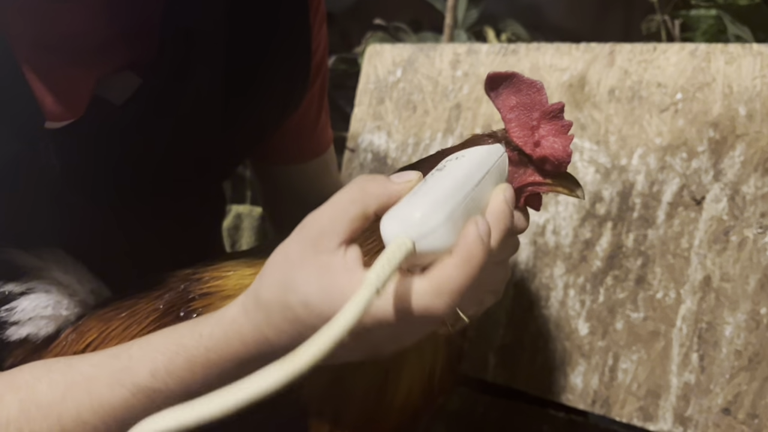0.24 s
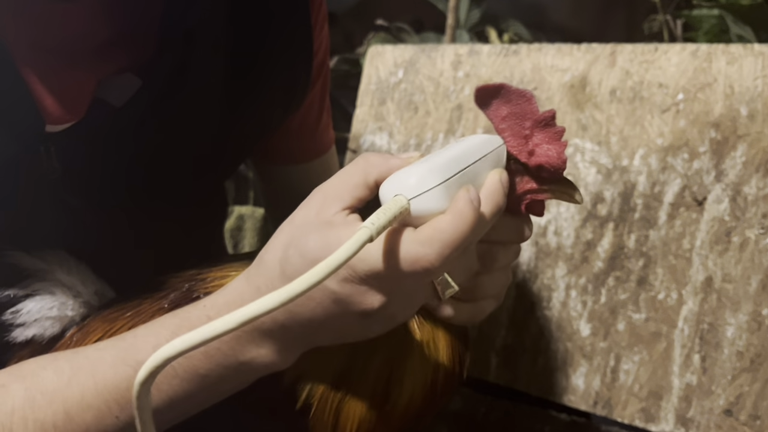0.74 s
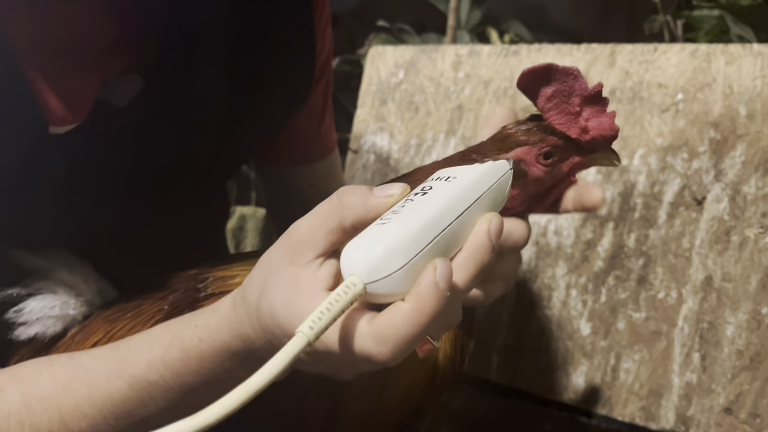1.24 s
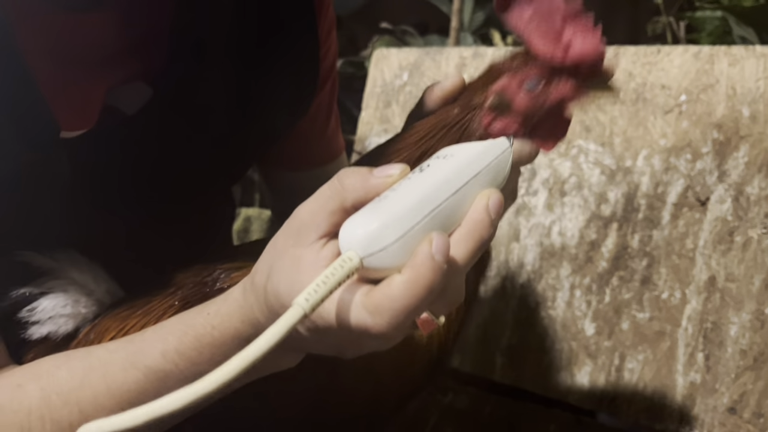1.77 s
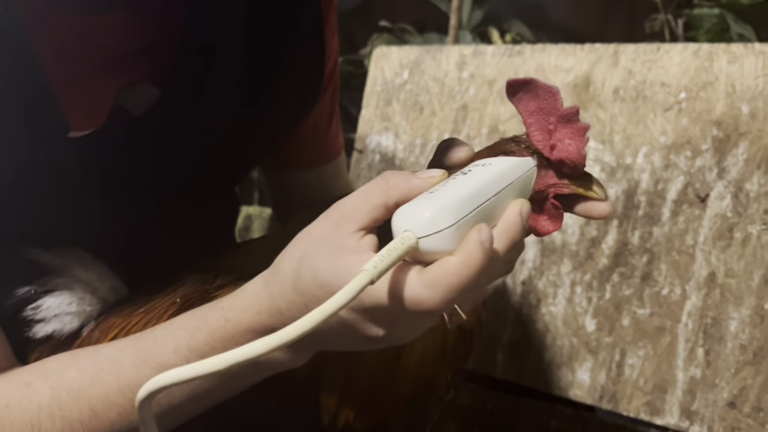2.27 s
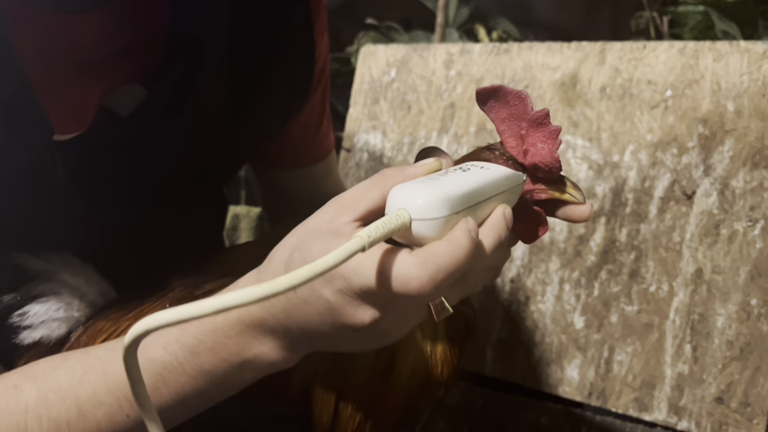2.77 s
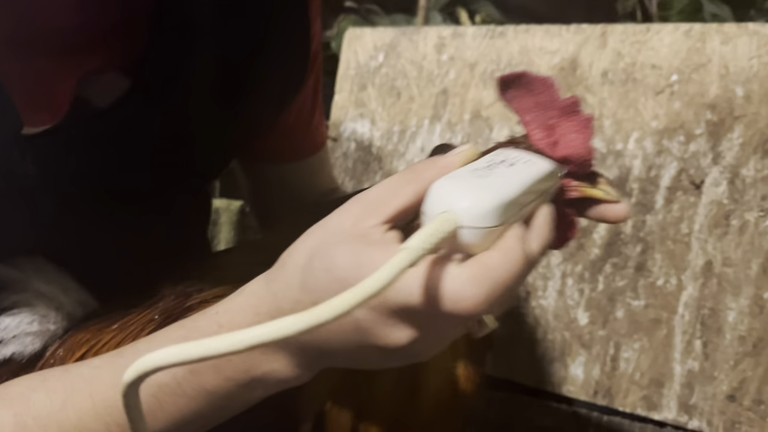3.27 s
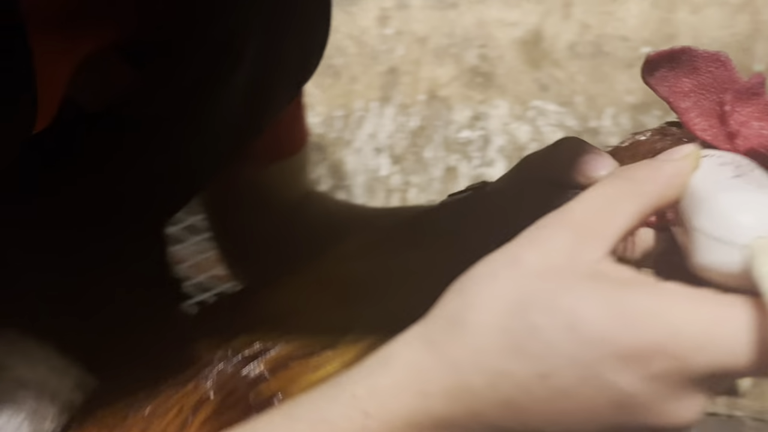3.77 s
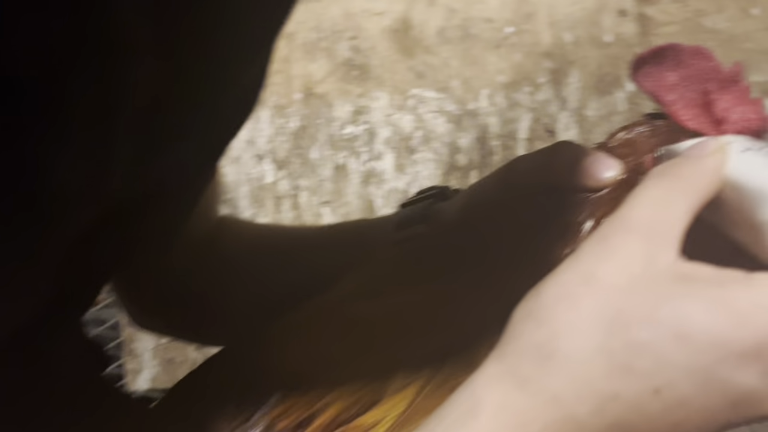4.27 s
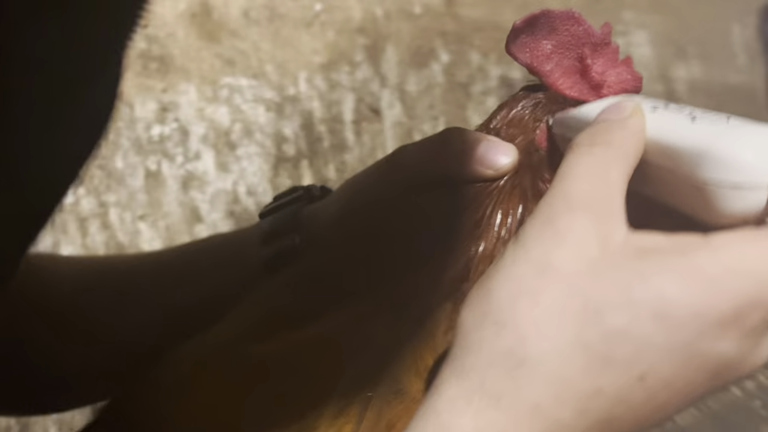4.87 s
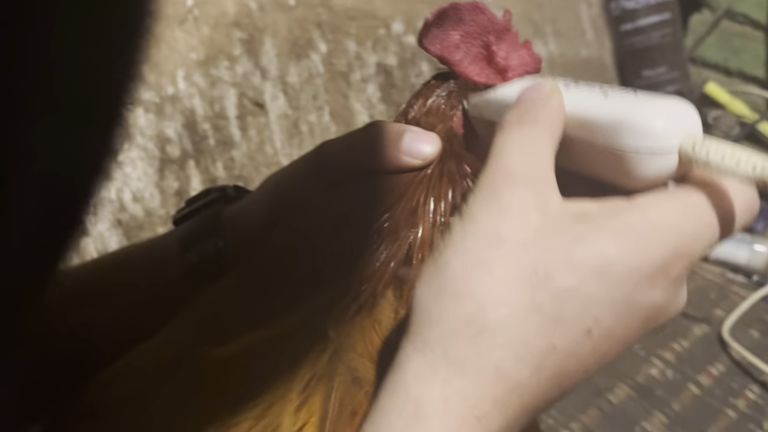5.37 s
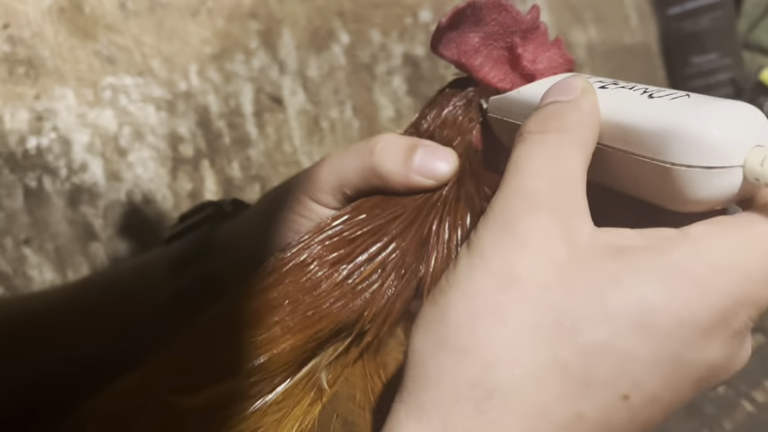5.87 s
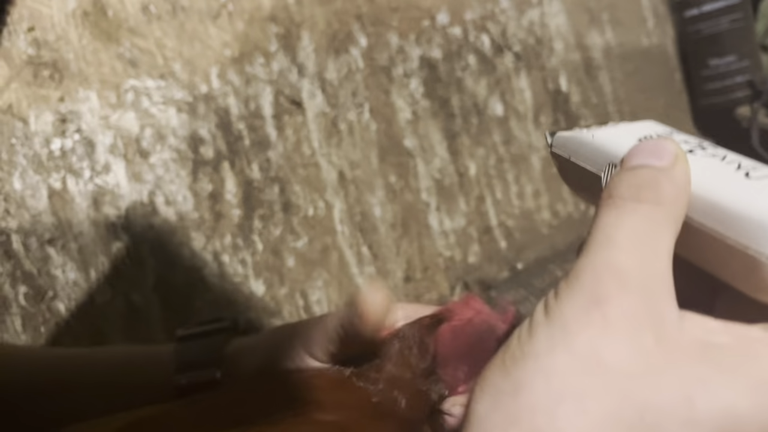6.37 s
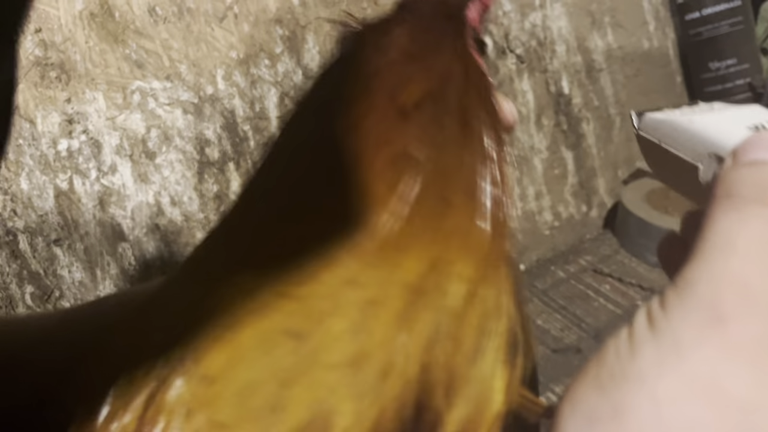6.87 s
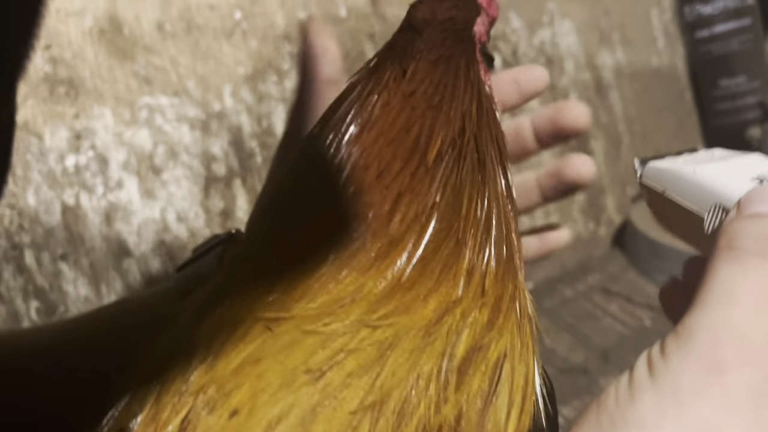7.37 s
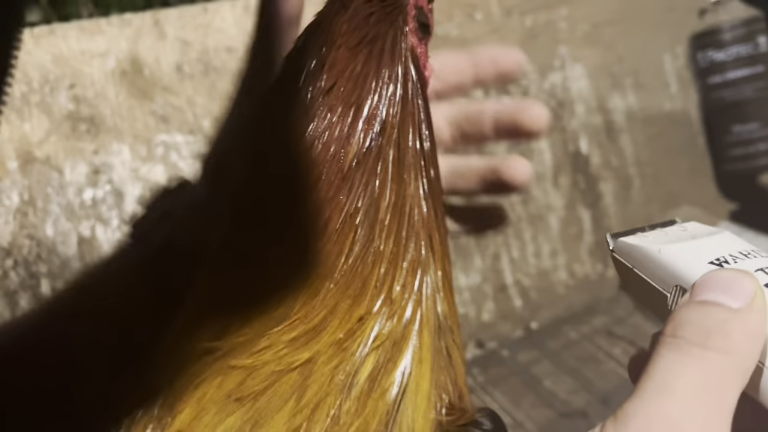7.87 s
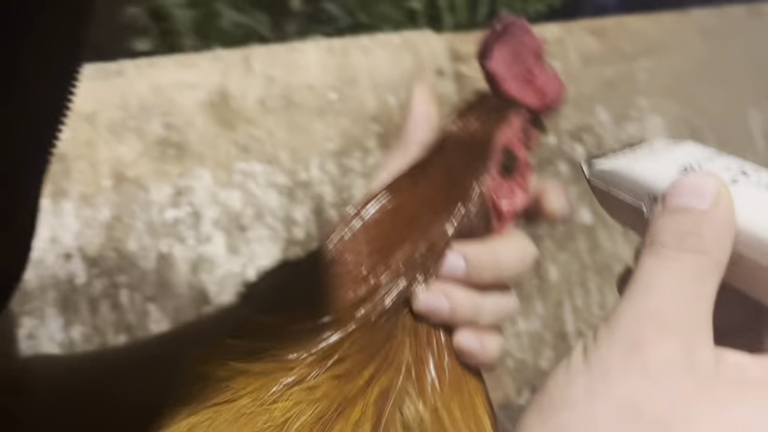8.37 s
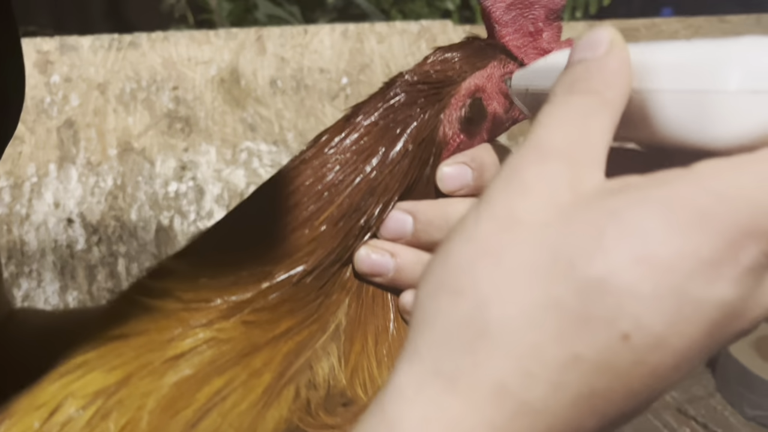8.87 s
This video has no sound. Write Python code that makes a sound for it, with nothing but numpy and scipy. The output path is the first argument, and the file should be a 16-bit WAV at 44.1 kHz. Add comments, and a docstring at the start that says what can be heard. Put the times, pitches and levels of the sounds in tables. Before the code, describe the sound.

A corded clipper buzzes steadily up close while a rooster crows hoarsely, whines softly, flaps its wings, and starts crowing again in a small walled yard.

```python
"""A corded hair clipper buzzes close by throughout: motor knocks ring its housing, blades clack, scrape and
hiss. A chicken whines once; a rooster crows hoarsely in arches of pitch with brief clear moments; more whining
follows. The clipper turns from back to tip to flank and bites into a rooster's face feathers; a deep bump
follows. Wings beat, slapping and pushing air, before a second crow. Hands rustle plumage and low air rumbles.
Yard walls answer briefly; the recorder's stereo processing sets the two channels at different phases."""
import sys
import numpy as np
from scipy import signal
from scipy.fft import rfft, irfft, next_fast_len
from scipy.io import wavfile
from scipy.ndimage import uniform_filter1d, map_coordinates

SR = 44100
rng = np.random.default_rng(int(sys.argv[2]) if len(sys.argv) > 2 else 0)


def generate_wav(sig):
    """Save sig (samples, or channels by samples) to the path in sys.argv[1] as 16-bit PCM at SR."""
    pcm = np.round(np.clip(np.atleast_2d(sig).T, -1, 1) * 32767).astype(np.int16)
    wavfile.write(sys.argv[1], SR, pcm)


N = 403074
TIME = np.arange(N) / SR

# Levels in the tables are relative: each layer adds its own trim.
# motor speed, slower as the teeth bite: [time_s, turns_per_s]
MOTOR_SPEED = [(0.0, 98.9), (0.43, 99.5), (0.53, 98.7), (0.61, 102), (0.71, 98.5), (1.12, 99.3),
               (1.63, 99.1), (1.78, 99.8), (2.49, 99.0), (3.28, 99.8), (3.54, 98.1), (3.97, 99.1),
               (4.4, 98.7), (4.48, 97.2), (4.73, 95.4), (5.4, 95.9), (5.78, 97.7), (6.03, 97.4),
               (6.39, 98.2), (8.15, 99.7), (8.43, 99.8), (8.6, 99.3), (8.86, 100.1), (9.14, 107)]
# loudness as the clipper moves about: [time_s, housing_db, blade_db, hiss_db]
NEARNESS = [(0.0, -41, -38.5, -42), (0.25, -41.5, -36, -45), (0.5, -41.5, -42, -44.5),
            (1.55, -42, -39.5, -48), (2.2, -42.5, -41, -47.5), (2.62, -45, -44.5, -48),
            (3.29, -44.5, -40.5, -47), (3.49, -46.5, -39.5, -47), (3.9, -47.5, -40, -50),
            (4.23, -46.5, -38.5, -48), (4.6, -49, -34.5, -48.5), (4.86, -48, -34, -46.5),
            (5.27, -46, -44, -45.5), (5.85, -46, -35.5, -44), (6.4, -43, -33.5, -43.5),
            (6.88, -42, -33.5, -46.5), (7.25, -42, -34.5, -44), (7.79, -41, -33, -47),
            (8.43, -41, -36, -43), (8.84, -40, -33, -46)]
# side facing the microphone, 0 back, 1 tip, 2 flank, clipped to 0-2: [time_s, side]
TURN = [(0, 0.05), (3.15, 0.018), (3.75, 0.84), (4.5, 1.12), (5.5, 1.03), (6.4, 1.9), (8.8, 2.3)]
# how deep the teeth bite: [time_s, depth_0_to_1]
BITE = [(0, 0.7), (4.3, 0.92), (4.9, 1), (5.1, 1), (5.6, 1), (6.1, 1), (6.25, 0.28), (9.14, 0.2)]
# ring of the plastic housing, from three sides: [freq_hz, gain_db]
HOUSING_BACK = [(250, -46), (396, -38.5), (495, -5.5), (594, -25), (693, -15), (792, -12), (891, 3.5),
                (990, -7.5), (1089, -9), (1188, -8.5), (1287, -3.5), (1386, -10), (1485, -8), (1584, -23),
                (1683, -32), (1782, -7), (1881, -19.5), (1980, -18), (2079, -3), (2178, -15), (2277, -7.5),
                (2376, -3.5), (2475, -9.5), (2574, -8.5), (2673, -15.5), (2772, -1.5), (2871, -6.5),
                (2970, -2.5), (3069, -17), (3500, -41)]
HOUSING_TIP = [(250, -51), (384, -6), (480, -3), (576, -3), (672, 4.5), (768, -13), (864, 1.5), (960, -8),
               (1056, -11), (1152, -2.5), (1248, -3), (1344, -12.5), (1440, 0), (1536, -5.5), (1632, -9.5),
               (1728, -5), (1824, -20), (1920, -5.5), (2016, -12.5), (2112, -1.5), (2208, -8), (2304, -3),
               (2400, 2), (2496, -14), (2592, -5), (2688, -22), (2784, -16), (2880, -25), (2976, -6.5),
               (3500, -38)]
HOUSING_FLANK = [(250, -57.5), (396, -6), (495, 0.5), (594, 0), (693, 1), (792, -8), (891, -6.5),
                 (990, -17.5), (1089, -1.5), (1188, -3.5), (1287, -7.5), (1386, -16), (1485, 1), (1584, -8),
                 (1683, -4), (1782, -14), (1881, -7), (1980, -5.5), (2079, -10.5), (2178, 1.5), (2277, -7),
                 (2376, 0), (2475, -13), (2574, 0), (2673, -7), (2772, -13), (2871, -12), (2970, -33.5),
                 (3069, 0.5), (3500, -41)]
# ring of the blades, from three sides: [freq_hz, gain_db]
BLADE_BACK = [(1500, -35), (2600, -13), (3150, 11), (3400, 5), (3600, 9.5), (4250, 0.5), (4700, 1),
              (5000, -15), (5250, 4), (5480, -10), (5800, 2.5), (6280, 6), (6550, -31), (6900, 0),
              (7450, 3), (8200, -24), (9300, -34), (10500, -18), (14000, -30)]
BLADE_TIP = [(1500, -24.5), (2200, -1), (2850, -24.5), (3250, -2.5), (3650, 4.5), (4050, -4), (4450, 3),
             (4950, -8), (5280, -1.5), (5600, -36), (6700, -24), (7400, -15.5), (8200, -39), (9300, 1.5),
             (10500, -27), (14000, -21)]
BLADE_FLANK = [(1500, -15.5), (2400, -18), (2850, -19), (3300, -3), (3650, 1.5), (3950, -1.5), (4330, 5.5),
               (4850, -3.5), (5230, -2.5), (5700, -10), (6250, -9), (6600, -5), (7000, -8.5), (7450, -4.5),
               (8200, -39), (9300, -0.5), (10500, -21), (14000, -27)]
# blade contacts in one motor turn: [share_of_turn, level_db, beat_depth_db, gain_at_full_bite_db]
CONTACTS = [(0, 2.5, 3, 4.5), (0.075, -16, -4, -2), (0.36, 6, 5.5, -2), (0.509, -5, -10.5, 3),
            (0.681, -8, -7.5, 5)]
# hollow between hand and blade: [time_s, centre_hz]
HOLLOW = [(2.2, 3560), (3.16, 3300), (3.31, 3800), (4.09, 4300), (4.5, 3770), (4.8, 4400), (5.05, 3680),
          (5.5, 3650), (6.25, 4200), (6.6, 4130), (6.82, 4370), (8.1, 4200), (8.75, 3820), (8.84, 3570)]
# hiss of the sliding blade: [freq_hz, gain_db]
HISS = [(900, -19), (2500, -9), (5000, 1), (6400, 0), (7400, 5), (8400, -28.5), (9500, -3), (11000, -3),
        (13000, 0), (14400, -1)]
# teeth sliding on teeth: [freq_hz, gain_db]
SCRAPE = [(900, -20.5), (1500, -7), (2400, -5), (2850, -6.5), (3600, -5.5), (5000, -7.5), (5700, -5),
          (6500, -4), (7400, 2), (8400, -16.5), (12000, -19.5)]
# crack of a cut barb: [freq_hz, gain_db]
BARB = [(800, -36), (2500, -15), (4000, -8), (7300, -2), (8400, 5), (9600, -5), (11500, -11), (15500, -12)]
# brief bright clicks: [time_s, level_db]
CLICKS = [(0.37, -17), (1.67, -26), (1.91, -25), (3.79, -30), (4.543, -31), (5.118, -12), (5.65, -15),
          (6.027, -16), (6.1, -14), (8.323, -20), (8.362, -19)]
# syllables of the crows, overtones before a trim, rasp before strain: [start_s, crest_s, end_s, first_hz,
# crest_hz, last_hz, attack_s, release_s, level_db, octave_over_fundamental_db,
# overtones_over_fundamental_db, roughness_0_to_1, mean_flutter_hz, rasp_db, beak_opening_0_to_1]
SYLLABLES = [(0.528, 0.632, 0.69, 751, 902, 848, 0.025, 0.026, -20.5, -6, -4.5, 0.55, 231.5, -9, 0.3),
             (0.645, 0.674, 0.76, 831, 816, 657, 0.017, 0.074, -22.5, -3, -4, 0.6, 151, -4.5, 0.4),
             (0.695, 0.732, 0.815, 605, 591.6, 620, 0.012, 0.048, -37, 5, 3, 0.57, 130, 0, 0.4),
             (0.82, 0.882, 1.0, 753, 975.3, 850, 0.024, 0.045, -24, 1, -1, 0.63, 160, -6, 0.26),
             (0.971, 1.145, 1.22, 815, 943.5, 891, 0.018, 0.03, -27.5, 2.5, -4.5, 0.72, 399.7, -3.5, 0.3),
             (1.18, 1.28, 1.35, 890, 903, 888, 0.018, 0.029, -24.5, 4.5, -9.5, 0.35, 421, -4.5, 0.48),
             (1.305, 1.349, 1.565, 873.5, 853, 844, 0.018, 0.07, -25, 4, -8, 0.48, 460, -1, 0.22),
             (1.528, 1.563, 1.72, 650, 633, 599, 0.0083, 0.0098, -41.5, 3.5, 1, 0.78, 130.2, 4, 0),
             (1.676, 1.78, 2.11, 735, 817.3, 485, 0.025, 0.042, -30.5, 5, -9.5, 0.48, 150.3, -3, 0.03),
             (8.864, 8.945, 9.03, 739.4, 967, 856, 0.0085, 0.034, -19, -5.5, -4.5, 0.55, 200.6, -2, 0.9),
             (8.975, 9.007, 9.19, 791, 800, 637, 0.016, 0.04, -17.5, -8, -6.5, 0.5, 170.7, -2, 0.51)]
# moments when the voice breaks into a clear tone:
# [centre_s, half_length_s, clearness_0_to_1, fundamental_gain_db, octave_gain_db, overtone_gain_db]
CLEAR_TONES = [(0.596, 0.01, 0.6, -7, 6.5, 6.5), (0.625, 0.019, 0.5, -16, -1, 4),
               (0.873, 0.026, 1, 7, 13.5, 10.5), (1.013, 0.016, 0.6, 7, 5.5, 0),
               (1.483, 0.032, 0.02, -9, -1, 1), (1.674, 0.028, 0.4, 13, 6, 3),
               (1.966, 0.042, 0.87, 12, -17, 6), (2.022, 0.027, 0.75, -1, -7, 15),
               (2.078, 0.023, 0.4, 8, -23, -9), (8.874, 0.0033, 0.56, 6, -11, -11),
               (8.911, 0.0073, 1, -2, 13, 5), (9.135, 0.047, 0.95, -23, 11, 2)]
# soft gliding notes: [start_s, end_s, first_hz, last_hz, octave_level_db, fundamental_over_octave_db]
WHINES = [(0.1, 0.26, 615, 631, -52.5, 4), (2.33, 2.503, 520, 530, -55, -4),
          (2.507, 2.61, 571, 615, -52, -1), (2.657, 2.723, 641, 645, -35.5, -10),
          (2.798, 2.938, 688, 612, -42.5, -10.5), (2.959, 3.178, 618, 588, -41, -23),
          (3.162, 3.306, 573, 538, -43.5, -20), (3.282, 3.53, 718, 737, -44.5, -2.5),
          (3.541, 3.643, 577, 676, -39.5, -21), (6.302, 6.38, 550, 577, -42, -10)]
# throat resonances, beak narrow: [freq_hz, gain_db]
THROAT = [(1500, -3), (2350, -0.5), (2900, 12), (3400, -15), (3800, -2.5), (4250, -7.5), (4750, -3.5),
          (5300, -13), (6500, -8.5), (8000, -52)]
# turbulence in the throat, beak narrow: [freq_hz, gain_db]
RASP = [(500, -20), (750, 7.5), (1100, -13), (1450, -1), (2150, 7.5), (2600, -17), (3000, 0.5), (3400, -39),
        (3800, -19), (4250, -5.5), (4850, -21), (5300, -17), (5900, -10), (6500, -30), (9000, -45)]
# resonances of tone and turbulence, beak wide: [freq_hz, gain_db]
WIDE_BEAK = [(500, -28), (780, -8), (1150, -9), (1500, -9), (1950, -31), (2250, -12), (2600, -18),
             (3000, -8.5), (3250, 2.5), (3750, 5), (4050, 0), (4350, 1.5), (4850, -9.5), (5250, 5),
             (5850, -15), (6500, -9), (9000, -16)]
# lead of the left channel for the birds, added to the channels' common lead: [freq_hz, lead_rad]
BIRD_LEAD = [(200, -0.9), (900, 0.62), (1450, 0.5), (1720, 2.2), (1950, 1.27), (3100, 2.45), (4200, 1.6),
             (5600, 3), (7500, -7.5)]
# blows of wings and body, a slap and then a push of air:
# [slap_s, slap_hz, slap_db, wait_for_push_s, push_hz, push_half_length_s, push_db]
BLOWS = [(5.053, 300, -39, 0.024, 144.5, 0.011, -36), (5.881, 325, -28, 0.0073, 109, 0.0042, -13.5),
         (5.949, 224, -23, 0.006, 100.5, 0.017, -21), (7.242, 340, -28, 0.007, 142.5, 0.0067, -22),
         (7.409, 338, -28.5, 0.013, 132, 0.011, -26.5), (7.539, 340, -23, 0.029, 166, 0.0086, -29),
         (7.676, 338, -21.5, 0.032, 172, 0.01, -29.5), (7.834, 380, -28.5, 0.0073, 171.5, 0.017, -24),
         (8.056, 380, -26, 0.012, 141, 0.0056, -32.5)]
# swish of the wing feathers: [freq_hz, gain_db]
FEATHERS = [(1200, -18.5), (2000, -19), (2450, -1), (2800, -13.5), (3400, -9.5), (6000, -27)]
# hands brushing the plumage: [centre_s, half_length_s, centre_hz, level_db]
RUSTLES = [(0.357, 0.013, 600, -38), (4.327, 0.018, 350, -47), (4.592, 0.025, 705, -43.5),
           (5.063, 0.033, 219.4, -46), (5.16, 0.018, 700, -48), (5.325, 0.051, 600, -45),
           (5.912, 0.079, 127, -35.5), (7.12, 0.027, 646, -41), (7.28, 0.053, 497, -44),
           (7.457, 0.032, 550, -43), (8.11, 0.04, 280, -46)]
# course of the air's rumble: [time_s, level_db]
RUMBLE = [(0.05, -44), (3.35, -50), (3.65, -49), (3.82, -46), (4.0, -47.5), (4.4, -46.5), (4.55, -45.5),
          (6.0, -44.5), (6.85, -49), (7.3, -41), (7.9, -41.5), (8.05, -39.5), (8.2, -41.5), (9.05, -44.5)]
# colour of the air's rumble: [freq_hz, gain_db]
LOW_AIR = [(15, -41), (30, -28), (45, 3), (70, 0.5), (100, -7.5), (150, -20), (300, -18), (450, -20),
           (1000, -19.5), (3000, -15), (9000, -30)]
# decay of the yard's echoes: [freq_hz, t60_s]
YARD = [(200, 0.16), (900, 0.35), (3000, 0.17), (10000, 0.0037)]
# lead of the left channel from the recorder's stereo processing: [freq_hz, lead_rad]
CHANNEL_LEAD = [(20, .1), (60, .2), (300, .6), (600, .9), (1000, 1.1), (1400, 2.6), (1750, 5.6), (2600, 5.8),
                (3400, 5.55), (4300, 5.85), (5600, 5.2), (6600, 5.4), (7400, 4.5), (8200, 3.2), (9300, 2.8),
                (10200, .2), (13400, .1), (14500, -2.8)]
# response of the microphone: [freq_hz, gain_db]
MICROPHONE = [(13800, 0), (14500, 5.5), (14900, -22), (15800, -25)]

KNOCK_BAND_HZ, CLACK_BAND_HZ = (450, 1080), (3400, 5500)  # bands in which levels are set
JITTER_S = 2e-6  # timing scatter of a free-running blade
MAINS_RIPPLE_HZ = 120
SCRAPE_OVER_HISS_DB = 2
RISE_POWER, FALL_POWER = 2.0, 0.92  # pitch curve on either side of the crest
FADE_DB = 25  # depth of attack and release
SWELL_DB, SWELLS_PER_S = 0.92, 24.1  # unsteady effort
CROW_OVERTONE_TRIM_DB = -1.5
FLICKER_DB, FLICKERS_PER_S = 2.6, 45  # for a fully rough fundamental; more in higher partials
WHINE_EDGE_S, WHINE_ROUGHNESS, WHINE_OVERTONES_OVER_OCTAVE_DB = 0.015, 0.38, -15
PUFF_FALL_OCTAVES = 0.34  # per half length
SLAP_HALF_CYCLES = 1.5  # half length of a slap, in cycles
BUMP_S, BUMP_HZ, BUMP_HALF_S, BUMP_DB = 5.98, 50, 0.053, -25  # a deep bump against the microphone
FLAP_START_S, WINGBEAT_S, SWISH_HALF_S, SWISH_DB = 7.145, 0.1557, 0.05, -32
RUSTLE_WIDTH_OCTAVES = 0.87
TOP_HZ = 15750


def amp(db):
    """Decibels to gain."""
    return 10 ** (np.asarray(db) / 20)


def unit(x):
    """x at rms 1."""
    return x / np.sqrt(np.mean(np.abs(x) ** 2) + 1e-20)


def along(points, hz):
    """[freq_hz, value] points read on a log axis."""
    freq_hz, value = np.transpose(points)
    return np.interp(np.log(hz + 1), np.log(freq_hz + 1), value)


def curves(rows, t=TIME):
    """Each column after the time, read at the times t."""
    time_s, *columns = np.transpose(rows)
    return [np.interp(t, time_s, column) for column in columns]


def wobble(rate_hz, size=N):
    """A smooth random curve with rate_hz knots a second."""
    knots = rng.standard_normal(int(N * rate_hz / SR) + 4)
    return map_coordinates(knots, [np.arange(size) * rate_hz / SR])


def filtered(x, response):
    """x times a response of frequency."""
    size = next_fast_len(N + SR // 2, True)
    return irfft(rfft(x, size) * response(np.fft.rfftfreq(size, 1 / SR)), size)[..., :N]


def noise(spectrum):
    """Coloured noise of rms 1."""
    return unit(filtered(rng.standard_normal(N), lambda hz: amp(along(spectrum, hz))))


def ring(x, spectrum, size=4096):
    """x through a causal, minimum-phase body with this spectrum."""
    cepstrum = irfft(np.log(amp(along(spectrum, np.fft.rfftfreq(size, 1 / SR)))))
    cepstrum[1:size // 2] *= 2
    cepstrum[size // 2 + 1:] = 0
    return signal.fftconvolve(x, irfft(np.exp(rfft(cepstrum))))[:N]


def unit_in(x, band_hz):
    """x scaled to rms 1 inside a band."""
    return x / np.std(filtered(x, lambda hz: (hz > band_hz[0]) & (hz < band_hz[1])))


def pulses(times_s, sizes):
    """Impulses placed between samples by windowed sincs."""
    at = times_s[:, None] * SR
    taps = np.floor(at).astype(int) + np.arange(-7, 9)
    shape = np.sinc(taps - at) * np.cos(np.pi * (taps - at) / 16) ** 2
    return np.bincount(np.clip(taps, 0, N).ravel(), (sizes[:, None] * shape).ravel(), N + 1)[:N]


def lead(x, phases):
    """Left ahead of right by [freq_hz, lead_rad]."""
    return filtered(x, lambda hz: np.exp(.5j * np.outer([1, -1], along(phases, hz))))


def echoes(x, t60s, delay_s):
    """A diffuse decaying tail for each channel, the left of energy 1."""
    hz, t, grains = signal.stft(rng.standard_normal((2, SR // 2)), SR, nperseg=256)
    decay = amp(-60 * t / along(t60s, hz)[:, None])
    tail = signal.istft(grains * decay, SR, nperseg=256)[1]
    delayed = np.pad(x, (int(abs(delay_s) * SR), 0))
    return signal.fftconvolve(delayed[None], tail / np.linalg.norm(tail[0]), axes=1)[:, :N]


def clipper():
    """A motor drives the blade: housing knocks, clacks, sliding friction and cut feathers add up."""
    housing_db, blade_db, hiss_db = curves(NEARNESS)
    turns = np.cumsum(curves(MOTOR_SPEED)[0] + 0.0595 * wobble(25)) / SR
    side = np.clip(curves(TURN)[0], 0, 2)
    bite = np.clip(curves(BITE)[0], 0, 1)
    shares = np.clip(1 - np.abs(side - np.arange(3)[:, None]), 0, 1)
    exposed = np.minimum(side, 1)
    clacks = blade_clacks(turns, bite)
    # each clack ends in a brief chatter of the teeth
    contact = signal.lfilter([1], [1, -np.exp(-1 / (0.00043 * SR))], clacks)
    blades = amp(blade_db + 2.0) * blade_ring(clacks, contact, turns, bite, shares)
    rattle = amp(-5.5 - 11.7 * exposed) * shell(blades)  # from the back nearly as loud as the direct clacks
    direct = amp(-3 * (1.5 - exposed)) * blades
    housing = amp(housing_db - 0.24) * housing_knocks(turns, bite, shares)
    return housing + direct + rattle + sliding(contact, turns, hiss_db) + snips(bite, turns)


def strikes(turns, lag, beat_db, scatter_db, jitter_s, bite):
    """One blow per turn; the mains ripple beats against the motor and feathers unsettle the timing."""
    whole = np.arange(1, int(turns[-1]) - 1)
    times_s = np.interp(whole + lag, turns, TIME)
    ripple = np.sin(2 * np.pi * MAINS_RIPPLE_HZ * np.interp(whole, turns, TIME))
    late, force = rng.standard_normal((len(times_s), 2)).T
    unsettled = 1 + 4 * np.interp(times_s, TIME, bite)
    return pulses(times_s + jitter_s * late * unsettled, amp(beat_db * ripple + scatter_db * force))


def facing(x, sides, shares, band_hz):
    """x rung through each side of a body, blended by how far that side faces the microphone."""
    return sum(share * unit_in(ring(x, side), band_hz) for share, side in zip(shares, sides))


def housing_knocks(turns, bite, shares):
    """The motor knocks the plastic housing once a turn and makes it ring."""
    knocks = strikes(turns, lag=0.1315, beat_db=1.5, scatter_db=0.0, jitter_s=JITTER_S, bite=bite)
    return facing(knocks, (HOUSING_BACK, HOUSING_TIP, HOUSING_FLANK), shares, KNOCK_BAND_HZ)


def blade_clacks(turns, bite):
    """The blade clacks at both ends of its stroke and bounces; biting shifts the contacts' levels."""
    clacks = np.zeros(N)
    for share, level_db, beat_db, load_db in CONTACTS:
        blows = strikes(turns, lag=share, beat_db=beat_db, scatter_db=0.87, jitter_s=JITTER_S, bite=bite)
        clacks += amp(level_db + load_db * bite) * blows
    return clacks


def blade_ring(clacks, contact, turns, bite, shares):
    """Clacks and chatter ring the steel and the hollow under the hand; feathers strengthen the chatter."""
    chatter = amp(-18.5) * (1 + 2 * bite) * unit(contact * tooth_pattern(turns, drift_hz=5))
    steel = facing(unit(clacks) + chatter, (BLADE_BACK, BLADE_TIP, BLADE_FLANK), shares, CLACK_BAND_HZ)
    return unit_in(hollow(steel, boost=1.28, width_hz=620), CLACK_BAND_HZ)


def tooth_pattern(turns, drift_hz, size=440):
    """Friction that repeats every turn and changes slowly as the blades settle."""
    patterns = rng.standard_normal((int(N * drift_hz / SR) + 4, size))
    place = [TIME * drift_hz, turns % 1 * size]
    return unit(map_coordinates(patterns, place, order=3, mode="grid-wrap"))


def hollow(x, boost, width_hz):
    """A resonance that slides with the grip, blended from fixed ones."""
    centres_hz = np.linspace(3000, 5000, 6)
    sliding_hz = curves(HOLLOW)[0]
    resonant = np.zeros(N)
    for c, share in zip(centres_hz, np.eye(len(centres_hz))):
        band = filtered(x, lambda f: 1j * f * width_hz / (c * c - f * f + 1j * f * width_hz))
        resonant += np.interp(sliding_hz, centres_hz, share) * band
    return x + boost * resonant


def shell(blades):
    """The shell rings on for a few milliseconds; its colour drifts slowly at random."""
    drift_rad = 0.35 * wobble(1.197)
    first, second = (echoes(blades, [(2000, 0.016), (10000, 0.0043)], delay_s=0.00023) for _ in range(2))
    return np.cos(drift_rad) * first + np.sin(drift_rad) * second


def sliding(contact, turns, hiss_db):
    """The sliding blade hisses at random and scrapes in a turn-by-turn pattern, both louder at contacts."""
    friction = 1 + 0.58 * unit(contact)
    hiss = amp(hiss_db + 4.5 + 1.8 * wobble(11)) * unit(friction * noise(HISS))
    scrape = unit(ring(friction * tooth_pattern(turns, drift_hz=3), SCRAPE))
    return hiss + amp(hiss_db + SCRAPE_OVER_HISS_DB) * scrape


def snips(bite, turns):
    """Barbs break as the teeth close, louder the deeper they bite; apart from them, brief bright clicks sound
    now and then."""
    barbs = strikes(turns, lag=0.44, beat_db=3, scatter_db=-4, jitter_s=2e-5, bite=bite)
    click_s, click_db = np.transpose(CLICKS)
    clicks = amp(11) * ring(pulses(click_s, amp(click_db)), BARB)
    return amp(-43) * bite ** 2 * unit(ring(barbs, BARB)) + clicks


def fowl():
    """Two crows and soft whines, with their yard echoes; the windpipe passes little bass."""
    whine = sum(call(whine_note(*note), flutter_hz=69.0, flutter=0.58, doubling=.2, rasp=0.59)
                for note in WHINES)
    windpipe = [(250, -36), (420, -11.5), (560, -2.5)]
    voices = filtered(crows() + whine, lambda hz: amp(along(windpipe, hz)))
    direct = lead(voices, BIRD_LEAD) * amp([[0], [-1.5]])
    return direct + amp(-7.0) * echoes(voices, YARD, delay_s=.004)


def crows():
    """Every syllable is a hoarse tone with rushing air in the throat."""
    voice = np.zeros(N)
    for *shape, flutter_hz, rasp_db, gape in SYLLABLES:
        controls = syllable(*shape)
        voice += call(controls, flutter_hz=flutter_hz, flutter=.6, doubling=.35, rasp=.35, gape=gape)
        voice += throat_air(controls, rasp_db, gape)
    return voice


def syllable(start, crest, end, first_hz, crest_hz, last_hz, attack, release, db, octave_db, overtones_db,
             rough):
    """One arch, clear at moments: [time_s, pitch_hz, roughness, fundamental_db, octave_db, overtones_db]."""
    t = np.arange(int(start * SR), int(end * SR)) / SR
    before = np.clip((crest - t) / (crest - start), 0, 1)
    after = np.clip((t - crest) / (end - crest), 0, 1)
    rise = (first_hz - crest_hz) * before ** RISE_POWER
    fall = (last_hz - crest_hz) * after ** FALL_POWER
    effort = db + envelope_db(t, attack, release) + SWELL_DB * wobble(SWELLS_PER_S, len(t))
    clear, first, second, upper = sum(np.outer(change, np.exp(-((t - s) / half) ** 2))
                                      for s, half, *change in CLEAR_TONES)
    overtones = effort + overtones_db + CROW_OVERTONE_TRIM_DB + upper
    return np.transpose([t, crest_hz + rise + fall, rough * (1 - clear),
                         effort + first, effort + octave_db + second, overtones])


def whine_note(start, end, first_hz, last_hz, db, fundamental_db):
    """The same controls for a straight glide with the beak nearly shut."""
    t = np.arange(int(start * SR), int(end * SR)) / SR
    effort = db + envelope_db(t, WHINE_EDGE_S, WHINE_EDGE_S)
    pitch_hz = np.linspace(first_hz, last_hz, len(t))
    return np.transpose([t, pitch_hz, np.full(len(t), WHINE_ROUGHNESS), effort + fundamental_db,
                         effort, effort + WHINE_OVERTONES_OVER_OCTAVE_DB])


def envelope_db(t, attack, release):
    """Attack, hold and release over the times t."""
    return -FADE_DB * (np.clip(1 - (t - t[0]) / attack, 0, 1) + np.clip(1 - (t[-1] - t) / release, 0, 1))


def call(rows, flutter_hz, flutter, doubling, rasp, gape=0, count=10):
    """A syrinx tone; when hoarse, a second membrane flutters, the period doubles and the tone frays."""
    start, stop = int(rows[0][0] * SR), min(N, int((rows[-1][0] + 0.031) * SR))
    t = TIME[start:stop]
    size = len(t)
    pitch_hz, rough, first_db, second_db, upper_db = curves(rows, t)
    rough = np.clip(rough, 0, 1)
    shake = 1 + rough * (0.026 * wobble(261.2, size) + 0.0119 * wobble(50.3, size))
    phase = 2 * np.pi * np.cumsum(pitch_hz * shake) / SR
    membrane = 2 * np.pi * np.cumsum(flutter_hz * (1 + 0.179 * wobble(70.1, size))) / SR
    beating = np.exp(-1j * membrane) + 0.57 * np.exp(1j * membrane)
    upper = np.array([beak(THROAT, k * pitch_hz, gape) * amp(-1.2 * k) for k in range(3, count + 1)])
    levels = [amp(first_db), amp(second_db), *(amp(upper_db) * upper / np.linalg.norm(upper, axis=0))]
    voice = np.zeros(size)
    for k, level in enumerate(levels, 1):
        fray = wobble(330.4, size) + 1j * wobble(329, size)
        fray = fray + 0.6 * (wobble(1000, size) + 1j * wobble(1000, size))
        doubled = doubling * min(k - 1, 1) * np.cos(phase / 2)
        # higher partials fray more
        sidebands = rough * np.sqrt(k) * (flutter * min(k / 2, 1) * beating + doubled + rasp * fray)
        power = 1 + np.abs(uniform_filter1d(np.abs(sidebands) ** 2, size=1500))
        flicker = amp(FLICKER_DB * np.sqrt(k) * rough * wobble(FLICKERS_PER_S, size))
        partial = np.real((1 + sidebands) * np.exp(1j * k * phase))
        voice += level * flicker * np.sqrt(2 / power) * partial
    fade = np.clip(np.minimum(t - t[0], t[-1] - t) / 0.0065, 0, 1)
    return np.pad(voice * fade, (start, N - stop))


def throat_air(rows, rasp_db, gape):
    """Turbulence in the throat grows with loudness, pitch and hoarseness."""
    pitch_hz, rough, first_db, second_db, _ = curves(rows)
    calling = (TIME > rows[0][0]) & (TIME < rows[-1][0] + .02)
    rush = unit(filtered(rng.standard_normal(N), lambda hz: beak(RASP, hz, gape)))
    strain = np.clip(rough, 0, 1) * (pitch_hz / 900) ** 2
    loudness = np.hypot(amp(first_db), amp(second_db))
    return calling * amp(rasp_db + 4.1 * wobble(300)) * strain * loudness * rush


def beak(narrow, hz, gape):
    """Gain of the throat's resonances, which shift as the beak opens wide."""
    gape = np.clip(gape, 0, 1)
    return amp((1 - gape) * along(narrow, hz) + gape * along(WIDE_BEAK, hz))


def wings(count=5):
    """Blows slap and push puffs of air, a deep bump against the microphone, a swish per wingbeat."""
    puffs = np.zeros(N)
    for s, slap_hz, slap_db, wait, push_hz, push_half, push_db in BLOWS:
        puffs += puff(s, slap_hz, SLAP_HALF_CYCLES / slap_hz, slap_db)
        puffs += puff(s + wait, push_hz, push_half, push_db)
    bump = puff(BUMP_S, BUMP_HZ, BUMP_HALF_S, BUMP_DB)
    sweep = sum(np.exp(-((TIME - FLAP_START_S - k * WINGBEAT_S) / SWISH_HALF_S) ** 2) for k in range(count))
    return puffs * amp([[1.5], [-1.5]]) + bump + amp(SWISH_DB) * sweep * noise(FEATHERS)


def puff(s, hz, half, db):
    """A short push of air that sinks in pitch."""
    near = np.abs(TIME - s) < 4 * half
    u = (TIME[near] - s) / half
    phase = 2 * np.pi * np.cumsum(hz * 2 ** (-PUFF_FALL_OCTAVES * u)) / SR
    air_push = np.zeros(N)
    air_push[near] = amp(db) * np.exp(-u ** 2) * np.sin(phase)
    return air_push


def rustles():
    """Hands shift their grip and brush the plumage: short bands of noise."""
    brushing = np.zeros(N)
    for s, half, hz, db in RUSTLES:
        near = np.abs(TIME - s) < 3 * half
        size = np.count_nonzero(near)
        octaves = np.log2((np.fft.rfftfreq(size, 1 / SR) + 1) / hz)
        band = np.exp(-(octaves / RUSTLE_WIDTH_OCTAVES) ** 2 / 2)
        grain = unit(irfft(rfft(rng.standard_normal(size)) * band, size))
        brushing[near] += amp(db) * np.exp(-((TIME[near] - s) / half) ** 2) * grain
    return brushing


def air():
    """The low rumble of the open air; a faint drone swells once and fades."""
    swell = np.exp(-((TIME - 5.63) / 0.25) ** 2)
    drone = amp(-51.0) * swell * noise([(190, -58), (235, 8), (255, 5), (310, -60.5)])
    return amp(curves(RUMBLE)[0] + 3.5) * noise(LOW_AIR) + drone


def scene():
    """Clipper, its echo off the walls, birds, hands and air in the yard."""
    buzz = clipper()
    walls = amp(-12) * echoes(buzz.mean(0), YARD, delay_s=.003)
    return buzz + walls + fowl() + wings() + rustles() + air()


def record(dry):
    """The two channels differ in phase by frequency, and nothing is kept above the band limit."""
    return filtered(lead(dry, CHANNEL_LEAD), lambda hz: amp(along(MICROPHONE, hz)) * (hz < TOP_HZ))


dry = scene()
out = record(dry)
generate_wav(out)
```